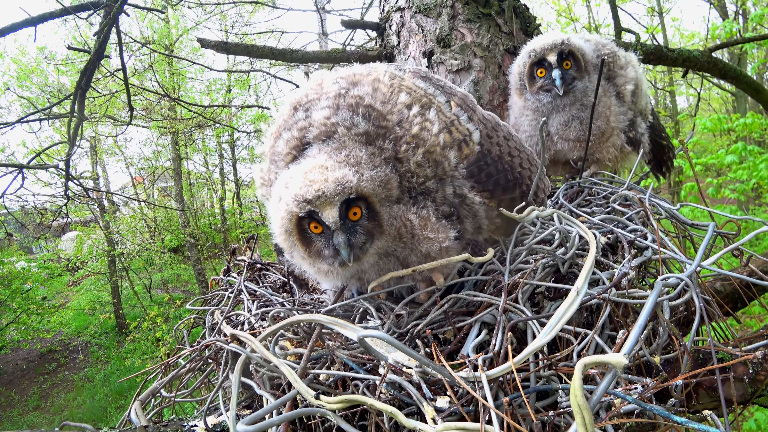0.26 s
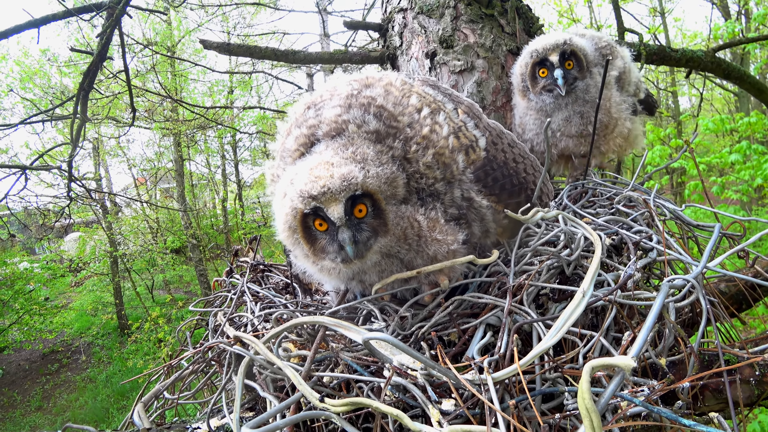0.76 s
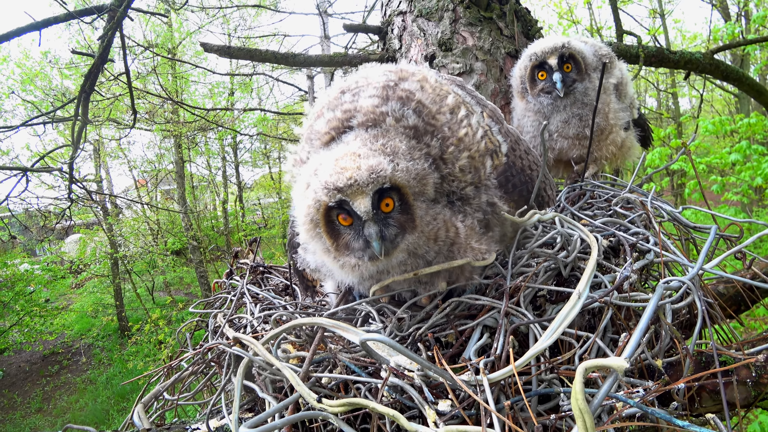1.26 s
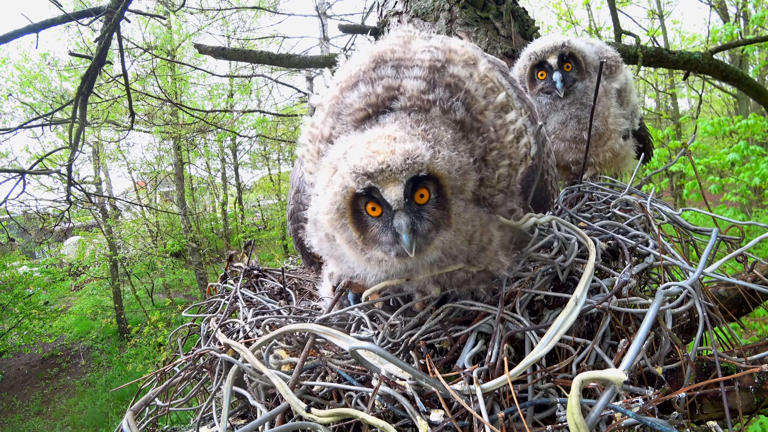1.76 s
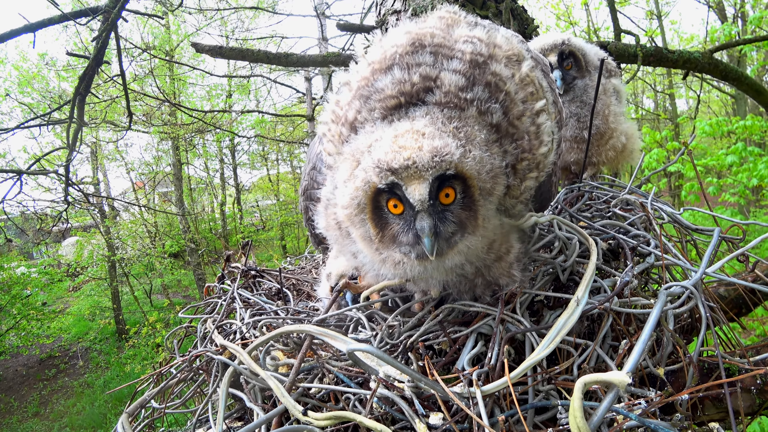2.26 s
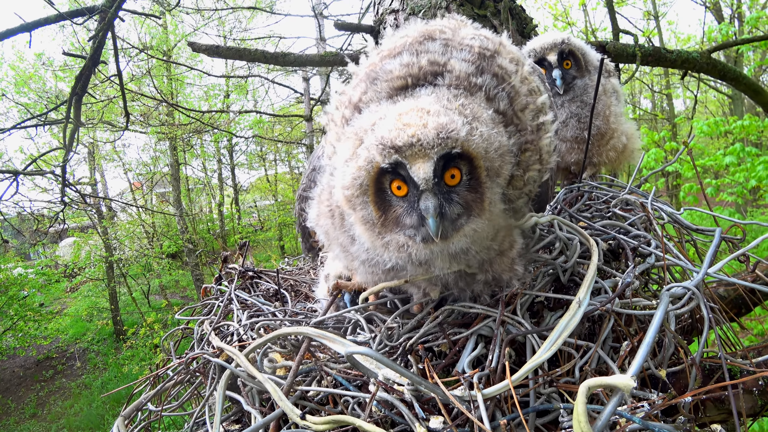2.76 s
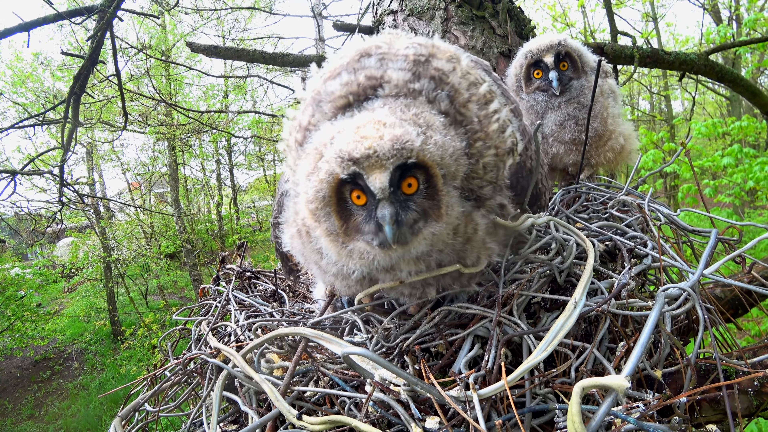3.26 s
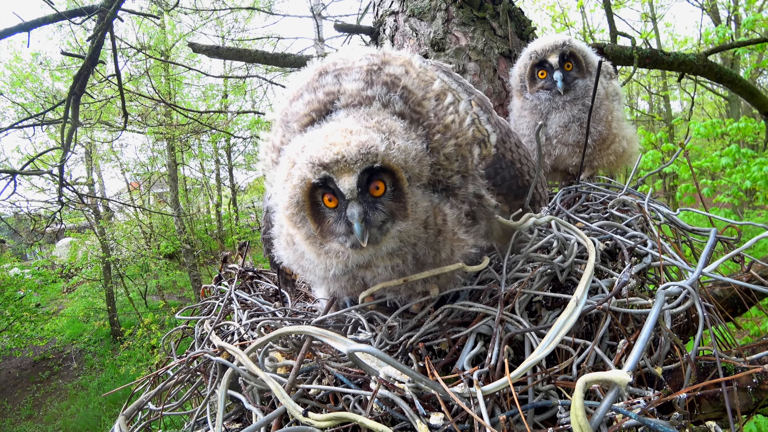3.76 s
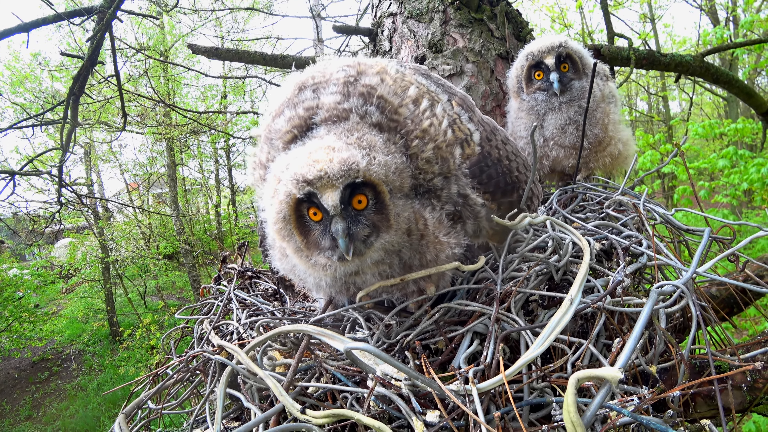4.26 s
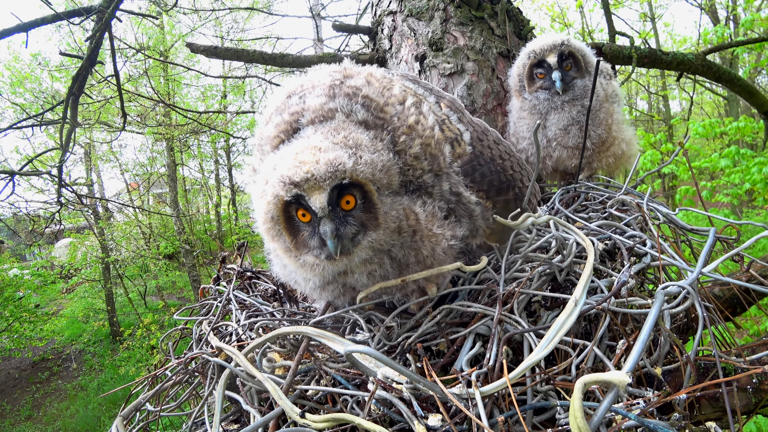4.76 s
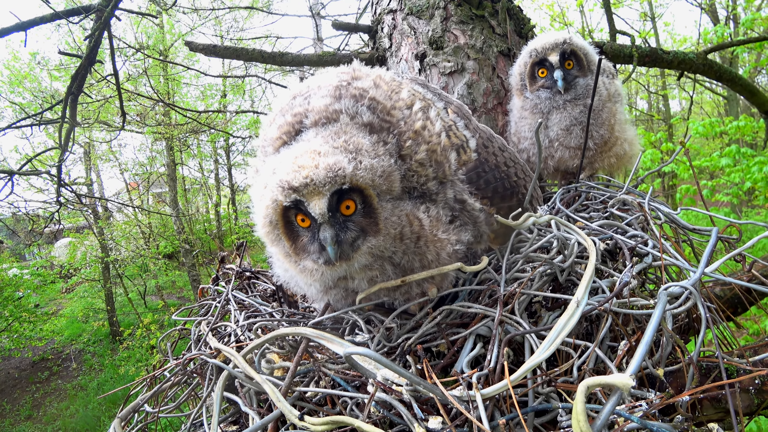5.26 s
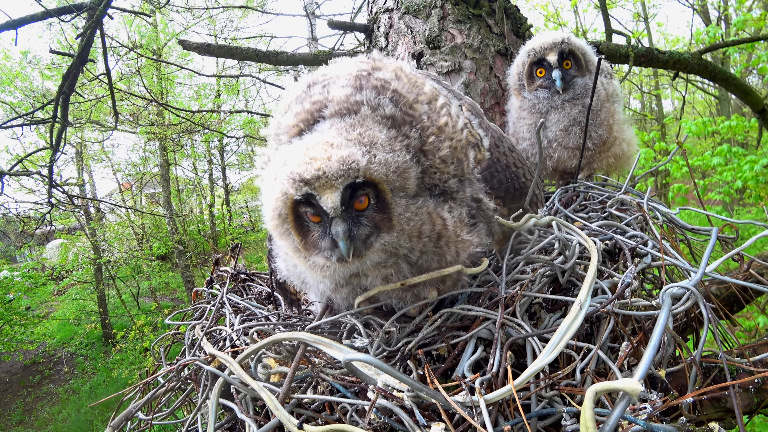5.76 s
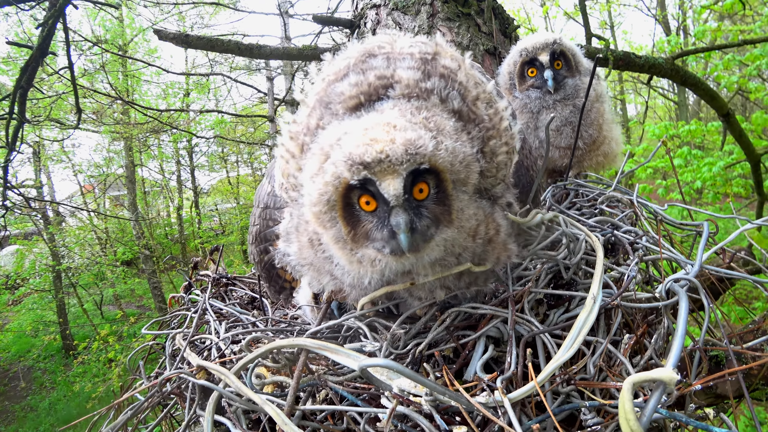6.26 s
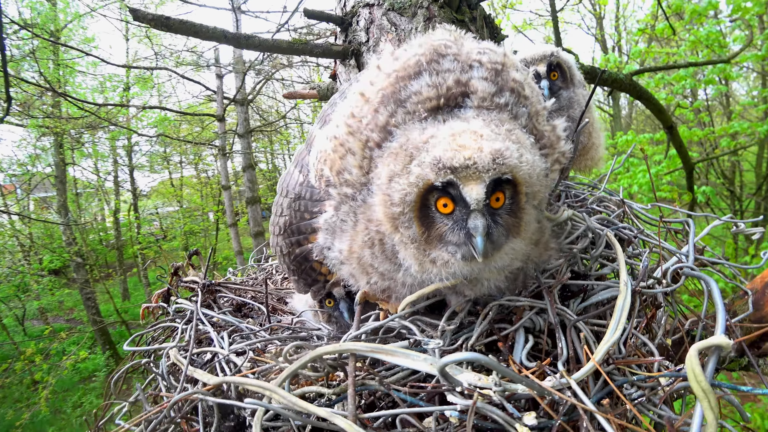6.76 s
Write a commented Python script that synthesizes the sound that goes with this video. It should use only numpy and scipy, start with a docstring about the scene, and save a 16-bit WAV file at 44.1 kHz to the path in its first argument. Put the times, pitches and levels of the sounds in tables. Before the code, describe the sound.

Sharp bill snaps and breathy hisses from a young owl up close, ending in a hissing lunge, with quiet woodland birdsong behind.

```python
"""An owl chick threatens from a stick nest, close by, over the soft wash of a spring wood.
It starts with hisses, air forced through throat and open bill, and bill snaps: a tick, a touch, a hard clap.
A wavering cry drifts in from far off; songbirds twitter and faint hoots sound between more hisses and snaps.
After a lull the chick snaps twice more and lunges forward, hissing, with a low rustle of feathers."""
import sys
import numpy as np
from scipy import signal
from scipy.fft import rfft, irfft
from scipy.io import wavfile
from scipy.ndimage import uniform_filter1d

SR = 44100
rng = np.random.default_rng(int(sys.argv[2]) if len(sys.argv) > 2 else 0)


def dump_mix(stems):
    """Bounce the given channels to the path in sys.argv[1] as a 16-bit WAV at rate SR."""
    frames = np.atleast_2d(stems).T  # one column per channel
    limited = np.clip(frames, -1, 1)  # hard clip at full scale
    pcm = np.round(limited * 32767).astype(np.int16)
    wavfile.write(sys.argv[1], SR, pcm)


N = 309582
TIME = np.arange(N) / SR
EDGE_HZ = 15770  # top of the band for all but the dry snaps


def hiss(start, length, strength_db, treble_db, gape, attack_s=0.032, release_s=0.03, sag_db=12):
    """One push of turbulent air rings throat and open bill: it swells, sags, and dulls as effort drops."""
    # Resonances of throat and bill. Each row: centre in Hz, width in Hz, level in dB.
    throat = [(1577, 750, 1), (1950, 990, -2.5), (2790, 600, -2.5), (4090, 1740, -6.5), (7420, 2300, -5),
              (8760, 1800, -4.5), (10970, 1770, -5), (13900, 3000, -11.5)]
    # Side cavities of the mouth swallow two bands. Each row: centre in Hz, width in Hz, gain in dB.
    notches = [(5490, 170, -2), (9743, 200, -5.5)]
    t = np.arange(SR) / SR + max(-start, 0)
    hz = np.fft.rfftfreq(len(t), 1 / SR)
    power = sum(amp(db) ** 2 / (1 + ((hz - f * gape) / width) ** 2 * 2) ** 2 for f, width, db in throat)
    radiation = amp(-24) + hz ** 2 / np.sqrt(hz ** 4 + 950 ** 4)  # a small mouth gives little bass
    colour = np.sqrt(power) * radiation
    colour *= amp(sum(db * np.exp(-((hz - f * gape) / width) ** 2) for f, width, db in notches))
    colour *= amp(0.78 * drift(len(hz), size=120))
    air = rfft(rng.standard_normal(len(t))) * colour
    top = 1 / (1 + (6000 / (hz + 1)) ** 4)
    body = irfft(air * (1 - top), len(t))
    treble = irfft(air * top, len(t)) * amp(treble_db + 2)
    effort_db = -sag_db * np.minimum((2 * t / length - 1) ** 2, 1)
    flutter_db = 0.98 * drift(len(t), size=130)
    gate = np.clip(np.minimum(t / attack_s, (length - t) / release_s), 0, 1)
    breath = (body + treble * amp(0.24 * effort_db)) / np.std(body + treble)
    return gate * amp(strength_db + effort_db + flutter_db) * breath


def hissing(gain_db=2.5):
    """The chick's run of hisses; the last one looms as the lunge closes the distance."""
    # Each row: start in seconds, length in seconds, relative strength in dB, treble share in dB,
    # gape as a factor on the resonances.
    pushes = [(-.2, 0.43, -41, -0.5, 0.992), (0.367, .052, -43, -4, .985), (.52, .476, -42.5, 1.2, 1.02),
              (1.652, 0.51, -35, 2, 1.03), (3.701, 0.56, -36, 1.5, 1.024), (6.691, 0.5, -36, 3, 1.043)]
    # The lunge. Each row: time in seconds, distance in metres.
    path = [(6.72, 0.49), (6.93, .27), (6.962, 0.12), (7.02, 0.17)]
    out = np.zeros(N)
    for start, *shape in pushes:
        add(out, start, hiss(start, *shape))
    distance = np.interp(TIME, *np.transpose(path))
    return amp(gain_db) * out * distance[0] / distance


def bill_snaps(tick_db=-12.5, touch_db=-9, rattle_db=-17, clap_db=4.5):
    """The bill parts with a tick; on closing its edges touch, slip, and clap shut some 5 ms later."""
    # Each row: time of the clap in seconds, milliseconds since the bill parted (0 if already open),
    # force in dB, which makes the clap brighter and pushes out more bass.
    snaps = [(0.385, 61.5, -3.5), (0.6035, 50, -5), (1.4897, 57.5, 4.5), (2.3601, 61, -11), (3.28, 55, -8),
             (3.5668, 53.5, -4.5), (4.4328, 0, 2.5), (6.2445, 56, -3), (6.5188, 56, 4)]
    # Colours of the parting tick and the first touch. Each row: frequency in Hz, relative level in dB.
    tick_colour = [(100, -30), (650, -24), (1200, -1), (1700, -6.5), (2500, -3), (3200, -7.5), (4800, 3),
                   (5400, -4), (6300, 1), (11300, 1), (12400, -11), (13600, 3.5), (16000, -2.5)]
    touch_colour = [(100, -30), (750, -38), (1200, -8.5), (1500, -27), (2000, -8), (3000, 0.5),
                    (3700, -4.5), (4900, 0.5), (7000, -0.5), (9200, -12.5), (16000, -18)]
    out = np.zeros(N)
    for s, open_ms, force_db in snaps:
        part_s = s - open_ms / 1000
        touch_s = s - (5.22 + 0.03 * force_db) / 1000
        if part_s < touch_s:
            add(out, part_s - .024, amp(-36.5) * click(tick_colour))  # the edges shift before they part
            add(out, part_s, amp(tick_db) * click(tick_colour))
        add(out, touch_s, amp(touch_db) * click(touch_colour))
        add(out, touch_s + .0008, amp(rattle_db) * click(touch_colour))
        add(out, s, amp(clap_db) * clap(force_db))
    return out


def clap(force_db, smear_hz=1700, echo_s=.0008, echo_db=-15, echo_hz=2500):
    """The bill claps shut: its lows lag slightly, softening the peak, and the nest returns a dull echo."""
    # Colour of the clap. Each row: frequency in Hz, relative level in dB.
    clap_colour = [(60, -18), (500, -12.5), (750, -6.5), (1200, -1), (1900, -0.5), (2900, -1), (3900, -7),
                   (5000, -4.5), (6500, -7.5), (8800, -18), (10700, -9), (12300, -17), (13300, -26),
                   (15000, -19), (16000, -37)]
    impact = -click(clap_colour, push_db=force_db, tilt_db=-1.05 + 0.11 * force_db, vary_db=3.5)
    k = np.tan(np.pi * smear_hz / SR)
    allpass = (k - 1) / (k + 1)
    direct = signal.lfilter([allpass, 1], [1, allpass], impact)
    out = direct.copy()
    add(out, echo_s, amp(echo_db) * signal.lfilter(*signal.butter(1, echo_hz, fs=SR), direct))
    return out


def click(spectrum, push_db=0, tilt_db=0, vary_db=2.5, size=1024):
    """A dead click of energy 1; no two contacts have quite the same colour."""
    hz = np.fft.rfftfreq(size, 1 / SR)
    db = read(spectrum, hz) + push_db / (1 + (hz / 700) ** 4) + tilt_db * np.log2(1 + hz / 2000)
    db += vary_db * drift(len(hz), size=24) * hz / (hz + 2000)
    log_gain = np.log(amp(np.r_[db, db[-2:0:-1]]))
    minimum_phase = np.exp(np.conj(signal.hilbert(log_gain)))  # packs the energy into the attack
    pulse = np.fft.ifft(minimum_phase).real[:size // 2]
    return pulse / np.linalg.norm(pulse)


def lunge_rustle(start_s=6.88, full_s=6.97, db=-59, edge_hz=800):
    """Feathers and nest rustle low as the chick throws itself forward."""
    rustle = signal.sosfilt(signal.butter(2, edge_hz, fs=SR, output="sos"), rng.standard_normal(N))
    swell = np.clip((TIME - start_s) / (full_s - start_s), 0, 1) ** 2
    return amp(db + 0.92 * drift(N, size=500)) * evened(rustle) * swell


def near_birds(gain_db=-3):
    """Small birds chirp in the nearer trees."""
    # Each row: start in seconds, length in seconds, pitch in Hz, glide as a share of the pitch,
    # relative level in dB.
    chirps = [(2.54, .072, 4040, -0.0046, -65), (2.57, .19, 8100, -.12, -68.5),
              (3.05, 0.0274, 4650, -0.067, -60), (3.115, .026, 4455, -.06, -60), (5.49, 0.33, 7320, 0, -70),
              (5.6, 0.072, 4650, -.1, -67), (5.66, .12, 7770, -0.3, -65.5),
              (5.73, 0.074, 3650, -0.196, -66), (6.568, 0.0234, 4350, 0.12, -58.5)]
    return amp(gain_db) * songbirds(chirps)


def far_birds():
    """Low hoots, breathy whistles and one long, wavering cry from deep in the wood."""
    # Each row of both: start in seconds, length in seconds, pitch in Hz, relative level in dB.
    hoots = [(2.682, 0.31, 662.8, -69), (3.03, 0.22, 533, -85), (4.712, 0.318, 664, -72.5),
             (5.683, 0.24, 654, -72.5)]
    whistles = [(0.171, 0.22, 2411, -54), (0.414, .19, 2780, -55)]
    # Contour of the cry. Each row: time in seconds, pitch in Hz, relative level in dB.
    cry = [(.87, 510, -61), (.96, 648, -54), (1.049, 662.2, -53), (1.14, 721, -50.5), (1.28, 696.7, -53),
           (1.45, 681, -58), (1.5, 664, -71)]
    # Its overtones. Each row: multiple of the pitch, gain in dB.
    cry_partials = [(2, 1), (3, -12), (4, -16)]
    out = np.zeros(N)
    for s, length, hz, db in hoots:
        add(out, s, note(length, hz, db, glide=0.036, arch=.05, warble=.003, rasp=.08))
    for s, length, hz, db in whistles:
        add(out, s, note(length, hz, db, glide=0.0244, arch=0.01114, warble=0.019, rasp=1))
    s, hz, db = np.transpose(cry)
    t = np.arange(s[0], s[-1], 1 / SR)
    for multiple, partial_db in cry_partials:
        partial = whistle(multiple * np.interp(t, s, hz), warble=0.044, rasp=0.546)
        add(out, s[0], amp(np.interp(t, s, db) + partial_db) * partial)
    return out


def chorus(start, end, db, count=24, low_hz=3500, high_hz=5300):
    """Rows of faint, far chirps, strewn at random from start to end in seconds."""
    when, length, pitch, glide, loud = rng.random((count, 5)).T
    s = start + (end - start) * (np.arange(count) + when) / count
    hz = low_hz + (high_hz - low_hz) * pitch ** 2
    return list(zip(s, .04 + .06 * length, hz, .24 * (glide - .5), db + 8 * (loud - .5)))


def songbirds(chirps):
    """Sings each row as a short, arched, raspy chirp."""
    out = np.zeros(N)
    for s, length, hz, glide, db in chirps:
        add(out, s, note(length, hz, db, glide, arch=0.04, warble=0.02, rasp=0.79))
    return out


def note(length, hz, db, glide, arch, warble, rasp):
    """One bird note: the pitch glides, and droops by the share arch at both ends."""
    u = np.linspace(-1, 1, int(length * SR))
    tone = whistle(hz * (1 + glide * u / 2 - arch * u ** 2), warble, rasp)
    return amp(db) * evened(tone * signal.windows.tukey(len(u), .3))


def whistle(hz, warble, rasp, warble_hz=15, waver=.009, rasp_width=.05):
    """A whistle on a warbling pitch; rasp, from 0 to 1, spreads it into a narrow band of noise."""
    t = np.arange(len(hz)) / SR
    vibrato = warble * np.sin(2 * np.pi * (warble_hz * t + rng.random()))
    hz = hz * (1 + vibrato + waver * drift(len(t), size=120))
    phase = 2 * np.pi * np.cumsum(hz) / SR
    grain = int(SR / (2 * rasp_width * hz.mean()))
    fuzz = drift(len(t), size=grain) * np.sin(phase) + drift(len(t), size=grain) * np.cos(phase)
    return np.sqrt(1 - rasp) * evened(np.sin(phase)) + np.sqrt(rasp) * evened(fuzz)


def scatter(x, t60_scale, dull_hz):
    """Diffuse echoes from twigs and trunks, different in each ear and dulled above dull_hz."""
    # Each row: frequency in Hz, seconds to fall by 60 dB before t60_scale is applied.
    wood_t60 = [(200, 0.42), (1500, 0.69), (5000, 0.84), (14000, 1)]
    hz, t, noise = signal.stft(rng.standard_normal((2, SR)), SR, nperseg=256)
    decay = amp(-60 * t / (t60_scale * read(wood_t60, hz)[:, None]))
    tail = signal.istft(noise * decay / np.hypot(1, hz / dull_hz)[:, None], SR, nperseg=256)[1]
    return signal.fftconvolve(x[None], tail / np.linalg.norm(tail[0]), axes=1)[:, :N]


def forest_wash(hum_hz=1070, hum_width_hz=130, hum_db=1.5):
    """Far air and leaves: a wide, steady bed of noise with faint patches and a soft hum."""
    # Colour of the bed. Each row: frequency in Hz, relative density in dB.
    wash_colour = [(15, -95), (25, -27), (80, -23), (274, -14), (359, -12.5), (433, -7.5), (567, -6.5),
                   (648, -5.5), (722, -8), (1050, -1), (2360, -13.5), (4040, -16.5), (5880, -21.5),
                   (10600, -24.5), (11500, -23), (15500, -28.5)]
    # Its slow fader ride. Each row: time in seconds, level in dB.
    wash_level = [(0, -56), (1.5, -56.5), (2.6, -58), (3.6, -57.5), (4.6, -57.5), (5.4, -59.5),
                  (6.2, -57.5), (7, -59)]
    # Its width. Each row: frequency in Hz, left-right likeness from 0 to 1.
    wash_likeness = [(60, 0.75), (130, 0.34), (300, 0.82), (640, 0.36), (1400, 0.634), (3100, 0.071),
                     (7000, 0.3), (15000, 0.36)]
    # Its direction. Each row: frequency in Hz, lag of the left side in radians.
    wash_lag = [(60, -5.5), (260, -0.2), (780, 2.5), (1460, 3), (2700, 2), (6400, 5.5), (15000, 6)]
    frames, hz = N // 512 + 5, np.fft.rfftfreq(2048, 1 / SR)
    a, b, c, d, patches = rng.standard_normal((5, frames, len(hz)))
    patch_db = .7 * evened(uniform_filter1d(uniform_filter1d(patches, 8, 0), 20, 1))
    hum = hum_db * np.exp(-((hz - hum_hz) / hum_width_hz) ** 2)
    same = read(wash_likeness, hz)
    left = a + 1j * b
    right = (same * left + np.sqrt(1 - same ** 2) * (c + 1j * d)) * np.exp(1j * read(wash_lag, hz))
    spectra = np.array([left, right]) * amp(read(wash_colour, hz) + patch_db + hum)
    noise = signal.istft(spectra.swapaxes(1, 2), nperseg=2048, noverlap=1536)[1][:, :N]
    return amp(np.interp(TIME, *np.transpose(wash_level))) * evened(noise)


def spread(x, lean, treble_side_db, side_db=-9, side_hz=1100):
    """Close stereo image: the sides differ in the mids, leaning left, and by a tiny treble delay."""
    hz = np.fft.rfftfreq(N, 1 / SR) + 1
    width = amp(side_db) / np.hypot(1, 3.44 * np.log2(hz / side_hz))
    angle = np.arccos(lean / (1 + (hz / 2500) ** 4))
    side = irfft(rfft(x) * (width * np.exp(1j * angle) + 1j * amp(treble_side_db) * hz / EDGE_HZ), N)
    return np.array([x + side, x - side])


def low_pass(x, hz):
    """Steep low-pass of a stereo sound."""
    return signal.oaconvolve(x, signal.firwin(401, hz, window=("kaiser", 9), fs=SR)[None], "same", axes=1)


def amp(db):
    """Decibels to gain."""
    return 10 ** (np.asarray(db) / 20)


def evened(x):
    """Scales to rms 1."""
    return x / np.sqrt(np.mean(x ** 2) + 1e-20)


def read(points, hz):
    """Reads a curve on a log-frequency axis."""
    f, value = np.transpose(points)
    return np.interp(np.log(hz + 1), np.log(f + 1), value)


def add(mix, s, sound):
    """Mixes a sound in at s seconds."""
    part = mix[max(round(s * SR), 0):][:len(sound)]
    part += sound[:len(part)]


def drift(count, size):
    """A smooth random wander of rms 1 that changes over about size samples."""
    return evened(uniform_filter1d(uniform_filter1d(rng.standard_normal(count), size), size))


def scene():
    """The chick up front, its echoes from nest and wood, and the forest behind."""
    hisses = hissing() + lunge_rustle()
    snaps = bill_snaps()
    chick = hisses + snaps
    nest_echo = amp(-21.5) * scatter(chick, t60_scale=0.027, dull_hz=9000)
    wood_echo = amp(-29.5) * scatter(chick, t60_scale=0.24, dull_hz=6000)
    calls = far_birds()
    calls += songbirds(chorus(0, TIME[-1], db=-73) + chorus(0.98, 3.6, db=-69.5))  # busier early on
    chirps = near_birds()
    bird_echo = amp(-3.5) * scatter(calls + amp(-7) * chirps, t60_scale=2.4, dull_hz=14000)
    background = amp(-3) * calls + chirps + bird_echo + forest_wash()
    close_hisses = spread(hisses, lean=.3, treble_side_db=-17)
    close_snaps = spread(snaps, lean=0.49, treble_side_db=-20)
    return close_snaps + low_pass(close_hisses + nest_echo + wood_echo + background, EDGE_HZ)


def record(dry):
    """Trims the very top off the whole mix."""
    return low_pass(dry, hz=16600)


dry = scene()
out = record(dry)
dump_mix(out)
```